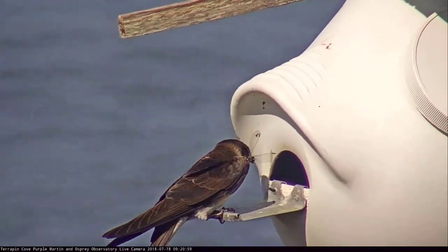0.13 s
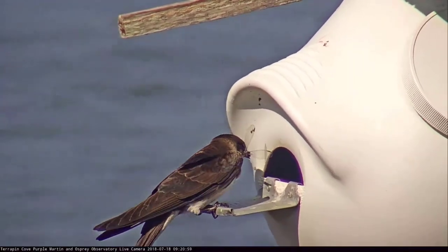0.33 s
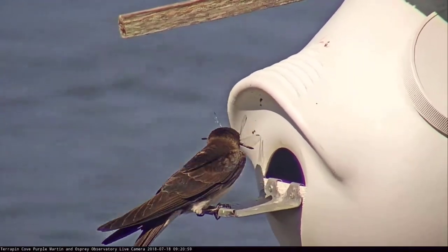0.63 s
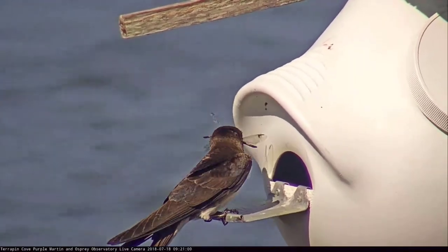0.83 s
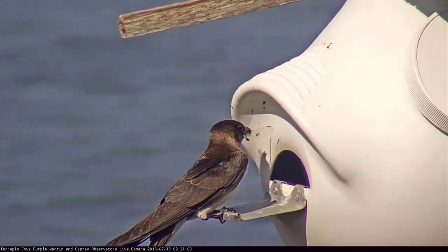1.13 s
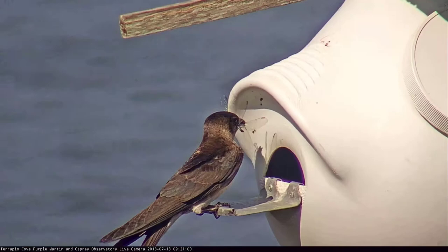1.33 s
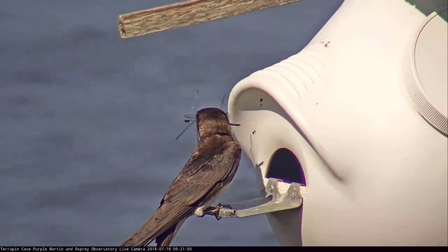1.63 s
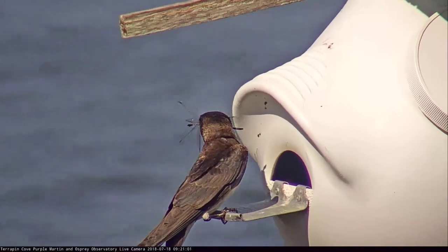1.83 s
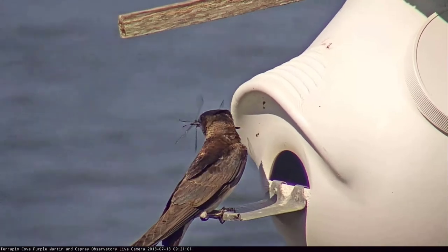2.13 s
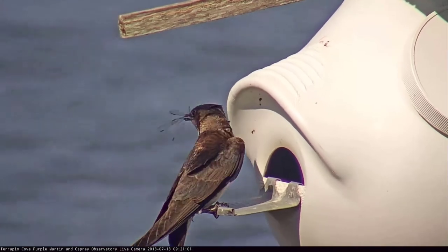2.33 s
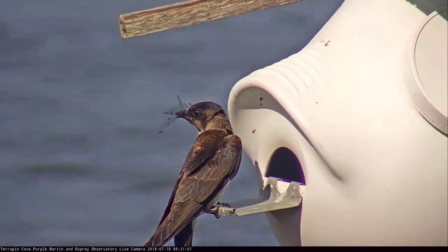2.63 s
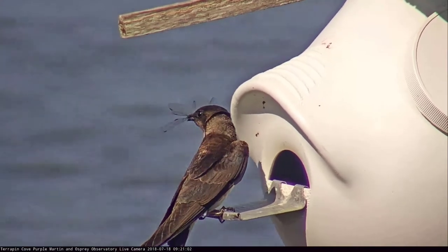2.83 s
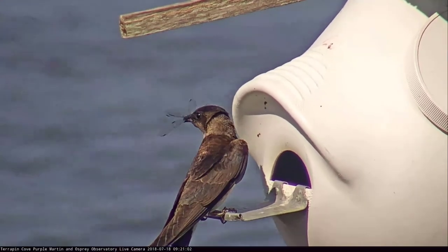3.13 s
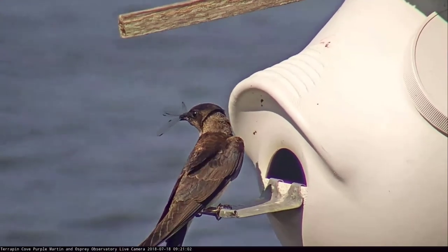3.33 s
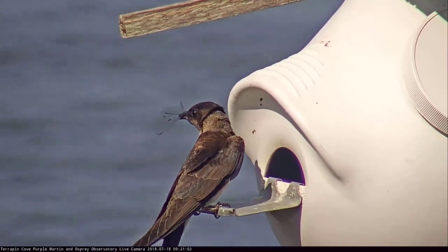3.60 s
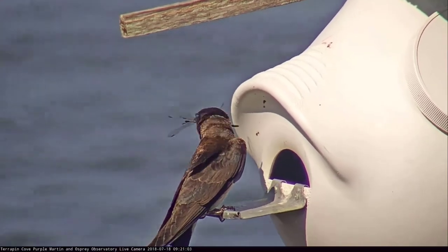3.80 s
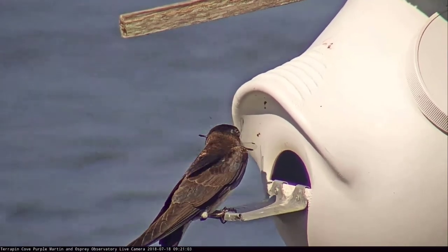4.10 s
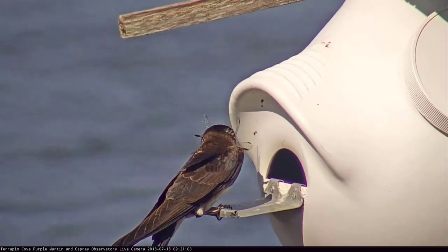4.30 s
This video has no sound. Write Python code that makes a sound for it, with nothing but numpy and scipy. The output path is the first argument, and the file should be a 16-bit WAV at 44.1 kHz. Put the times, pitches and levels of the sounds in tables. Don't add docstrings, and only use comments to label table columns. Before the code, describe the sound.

Outdoors beside water, many martins call several times a second with short whistled chirps that slide down. A loud longer reedy call comes early, nestlings buzz throughout, a close bird chortles and sings a falling run around one to two seconds, and more calls follow. A distant chorus and light breeze lie beneath; the camera microphone slightly clips the loudest notes.

```python
import sys
import numpy as np
from scipy import signal
from scipy.fft import rfft, irfft, next_fast_len
from scipy.io import wavfile
from scipy.ndimage import uniform_filter1d, map_coordinates

SR = 44100
rng = np.random.default_rng(int(sys.argv[2]) if len(sys.argv) > 2 else 0)


def to_wav(s):
    ch = np.atleast_2d(s).T
    pcm = np.round(np.clip(ch, -1, 1) * 32767)
    wavfile.write(sys.argv[1], SR, pcm.astype(np.int16))


def how_loud(loudness_db):
    steps = np.asarray(loudness_db, float) / 20
    return 10 ** steps


N = 196597

# (frequency [Hz], level [dB])
THROAT_TONE = [(1500, -13.5), (2300, -8.5), (3300, -0.5), (4500, 1), (7000, -11.5)]
LOUDEST_HZ = 3600


def unit(x):
    return x / np.sqrt(np.mean(x ** 2) + 1e-20)


def along(points, hz):
    f, v = np.transpose(points)
    return np.interp(np.log(hz + 1), np.log(f + 1), v)


def curve(rows):
    return np.interp(np.arange(N) / SR, *np.transpose(rows))


def wobble(rate, size=N):
    knots = rng.standard_normal(int(size * rate / SR) + 4)
    return map_coordinates(knots, [np.arange(size) * rate / SR])


def filtered(x, response):
    m = next_fast_len(N + 8192)
    return irfft(rfft(x, m) * response(np.fft.rfftfreq(m, 1 / SR)), m)[:N]


def throat(x):
    return filtered(x, lambda hz: how_loud(along(THROAT_TONE, hz)))


def rush(spectrum, patchy_db):
    z = signal.stft(rng.standard_normal(N + 512), nperseg=512)[2]
    field = uniform_filter1d(rng.standard_normal(z.shape), 5, 0)
    field = uniform_filter1d(field, 4, 1)
    x = signal.istft(z * how_loud(patchy_db * unit(field)), nperseg=512)[1][:N]
    return unit(filtered(x, lambda hz: how_loud(along(spectrum, hz))))


def add(track, s, sound):
    track[SR + round(s * SR):][:len(sound)] += sound


def whistle(hz, overtone_db):
    phase = 2 * np.pi * np.cumsum(hz) / SR
    return np.sin(phase) + how_loud(overtone_db) * np.sin(2 * phase)


def echoed(sound, echo_db, chance):
    out = np.pad(sound, (0, SR // 30))
    add(out, .003 + .003 * chance[0] - 1, how_loud(echo_db - 2 * chance[1]) * sound)
    for late, size in chance[2:].reshape(-1, 2):
        add(out, .006 + .018 * late - 1, how_loud(echo_db - 9 - 8 * late - 5 * size) * sound)
    return out


def slide(u, bend=.8):
    held = 1.12 * u ** 2 / (u + .12)
    return (np.exp(-bend * held) - np.exp(-bend)) / (1 - np.exp(-bend))


def chirps(rows, glide, flutter_db, overtone_db, echo_db, fade, tail=0, rise=1.7):
    track = np.zeros(N + 2 * SR)
    flutter, quiver = wobble(190, N + SR), wobble(260, N + SR)
    for (s, length, start_hz, end_hz, db, top), chance in zip(rows, rng.random((len(rows), 8))):
        u = np.linspace(0, 1 + tail, max(round(length * (1 + tail) * SR), 9))
        first = round(abs(s) * SR)
        at = slice(first, first + len(u))
        top = np.clip(top, .2, .92)
        falling = np.abs(np.sin(np.pi / 2 * (1 + tail - u) / (1 + tail - top))) ** fade
        swell = np.where(u < top, np.sin(np.pi / 2 * u / top) ** rise, falling)
        hz = end_hz + (start_hz - end_hz) * glide(u) + 35 * quiver[at]
        note = how_loud(db + flutter_db * flutter[at]) * swell * whistle(hz, overtone_db)
        add(track, s, echoed(note, echo_db, chance))
    return track[SR:SR + N]


def falls():
    # (time [s], length [s], start [Hz], end [Hz], peak [dB])
    close_calls = [(-.011, 0.032, 3780, 2556, -2), (.016, 0.019, 4750, 3600, -9),
                   (.04, 0.019, 2970, 2073, -1), (.08, 0.031, 4400, 3025, -6.5),
                   (.555, 0.023, 4300, 3420, -18), (.428, 0.015, 4020, 3366, -5),
                   (.73, 0.028, 2990, 2240, -11), (.757, 0.046, 3100, 1613, -9),
                   (1.784, 0.013, 4495, 3980, -15.5), (2.01, 0.012, 4670, 3870, -7.5),
                   (2.358, 0.036, 3410, 2145, -9), (2.387, .02, 3400, 2703, -10),
                   (2.377, 0.0172, 4904, 4254, -14.5), (2.572, 0.028, 4750, 3750, -9),
                   (2.595, 0.032, 3950, 3030, -5.5), (2.588, 0.012, 3780, 3170, -5.5),
                   (3.385, 0.012, 4457, 3866, -13.5), (3.427, 0.026, 3130, 2410, -12.5),
                   (3.707, .012, 3270, 2750, -23), (4.19, 0.024, 4010, 3030, -17.5),
                   (4.444, 0.032, 4630, 3530, -2)]
    # (time [s], start [Hz], end [Hz], peak [dB])
    steep = [
        (.602, 3757, 2240, -17),
        (.696, 4040, 3100, -20.5),
        (.878, 4950, 3830, -40),
        (.945, 2800, 2330, -26),
        (1.543, 2380, 1750, -19),
        (1.822, 2320, 1810, -19),
        (3.092, 3600, 2300, -20.5),
        (3.285, 2970, 2400, -30),
        (3.235, 2910, 2320, -15.5),
    ]
    # (time [s], start [Hz], end [Hz], peak [dB])
    common = [(.028, 2140, 1960, -12), (.066, 3976, 3460, -16), (.713, 3040, 2460, -16.5),
              (1.835, 2770, 2200, -16), (1.878, 4830, 3430, -23), (1.879, 3590, 2930, -25.5),
              (1.984, 2450, 2000, -22.5), (2.146, 4000, 3470, -16), (2.158, 2860, 2220, -15.5),
              (2.334, 3600, 2460, -21.5), (2.846, 3300, 2680, -24), (3.207, 3300, 2700, -24.5),
              (3.255, 3420, 2720, -38), (3.865, 3000, 2400, -17.5), (3.92, 3250, 2320, -26),
              (3.985, 3180, 2420, -28), (4.402, 4610, 2787, -16.5), (4.441, 3070, 2710, -18)]
    # (time [s], start [Hz], end [Hz], peak [dB])
    gentle = [(.066, 1920, 1650, -15), (.074, 2450, 2100, -17), (.291, 3940, 3470, -21),
              (.434, 2700, 2050, -15.5), (.497, 4120, 3680, -19.5), (.805, 2397, 2100, -11),
              (.984, 2680, 2470, -21), (1.936, 3020, 2780, -22), (2.062, 4310, 3870, -18),
              (2.07, 2580, 2320, -22), (2.438, 2510, 2190, -25), (2.874, 2580, 1830, -19),
              (3.474, 3180, 2560, -27.5)]
    rows = [*close_calls]
    for table, octaves_per_s in [(steep, 34.8), (common, 14), (gentle, 9.7)]:
        rows += [(s, np.log2(a / b) / octaves_per_s, a, b, db) for s, a, b, db in table]
    timed = []
    for s, length, a, b, db in rows:
        top = np.clip(0.93 * np.log(a / LOUDEST_HZ) / np.log(a / b), 0.26, 0.82)
        timed.append((s, length, a, b, db, top))
    return timed


def reedy(table, glide):
    # (frequency [Hz], level [dB])
    octave_tilt = [(4500, 0), (6500, -7)]
    reeds = chirps([(*row, 0.17) for row in table], glide, flutter_db=1.8, overtone_db=-19,
                   echo_db=-6, fade=4, tail=.25, rise=1.3)
    trail = chirps([(*row[:4], row[4] - 15, .7) for row in table], glide, flutter_db=2.5,
                   overtone_db=-24, echo_db=-14, fade=0.2)
    rows = [(s, length, 2 * a, 2 * b, -17 + 0.32 * db, .65) for s, length, a, b, db in table]
    octaves = chirps(rows, glide, flutter_db=0.5, overtone_db=-28, echo_db=-3.5, fade=0.33, tail=0.11)
    return reeds + trail + filtered(octaves, lambda hz: how_loud(along(octave_tilt, hz)))


def adults():
    # (time [s], length [s], start [Hz], end [Hz], peak [dB])
    arched = [(0.452, 0.028, 3120, 2990, -19.5), (.489, 0.027, 2875, 2550, -32),
              (0.735, 0.017, 4900, 4700, -20), (0.796, 0.031, 4160, 4020, -24.5),
              (.822, 0.014, 2060, 1990, -17.5), (1.438, 0.0081, 4500, 4400, -12.5),
              (1.768, 0.018, 3650, 3140, -20), (1.905, 0.03, 3870, 3390, -23),
              (2.421, .013, 3305, 3250, -20), (2.426, 0.02, 3547, 3310, -14),
              (2.567, 0.016, 4850, 4470, -18), (2.804, 0.014, 3920, 4150, -30),
              (2.877, 0.019, 3217, 3130, -16), (2.888, 0.048, 4020, 3800, -24.5),
              (3.251, 0.013, 3260, 2670, -22), (3.364, 0.019, 4760, 4700, -22.5),
              (3.626, 0.016, 4600, 4410, -18.5), (3.634, .024, 4300, 3330, -15),
              (4.058, 0.013, 3250, 3170, -19), (4.136, 0.015, 4110, 3900, -16),
              (4.14, 0.019, 2960, 3040, -19)]
    # (time [s], length [s], start [Hz], end [Hz], peak [dB])
    long_falls = [
        (2.817, .07, 4140, 1645, -9.5),
        (3.023, .071, 3620, 1713, -8),
    ]
    # (time [s], length [s], start [Hz], end [Hz], peak [dB])
    held_calls = [
        (.371, .077, 4194, 1808, 0.16),
        (3.997, .06, 3754, 1672, -7),
    ]
    hold = .05
    slides = chirps(falls(), slide, flutter_db=1.1, overtone_db=-19, echo_db=-5.5, fade=2.47, tail=0.56)
    reeds = reedy(long_falls, lambda u: slide(u, 2.4))
    reeds = reeds + reedy(held_calls, lambda u: slide(np.maximum(u - hold, 0) / (1 - hold), 1.65))
    warbles = chirps([(*row, .36) for row in arched], lambda u: 1 - u ** 2, flutter_db=3.2,
                     overtone_db=-33, echo_db=-11, fade=0.22)
    return throat(slides + reeds) + warbles


def chorus(count):
    # (time [s], level [dB])
    far_level = [
        (0.0, -28.5),
        (3.85, -28),
        (4.02, -26.5),
        (4.46, -29),
    ]
    # (frequency [Hz], level [dB per Hz])
    blur = [(710, -27), (1200, -22.5), (1520, -17), (2200, -8), (2630, -4), (3620, 2.5), (4660, -8),
            (5710, -8.5), (6590, -18), (9000, -53), (11700, -39), (19800, -120)]
    s, length, pitch, drop, size, top = rng.random((count, 6)).T
    start_hz = 3000 + 2300 * pitch
    end_hz = start_hz * (.82 - 0.241 * drop)
    rows = np.transpose([s * N / SR, 0.01493 + 0.02936 * length, start_hz, end_hz, 7 * size, 0.11 + 0.21 * top])
    calls = chirps(rows, slide, flutter_db=4.0, overtone_db=-28, echo_db=-9.5, fade=0.99)
    calls = filtered(calls, lambda hz: how_loud(0.088 * along(blur, hz)))
    return how_loud(curve(far_level)) * (how_loud(-10.5) * unit(calls) + how_loud(-1.5) * rush(blur, patchy_db=2.5))


def insect():
    # (time [s], level [dB])
    insect_level = [
        (0.0, -51),
        (0.17, -62),
        (4.46, -61),
    ]
    clicks = np.sin(2 * np.pi * np.cumsum(140 + 5 * wobble(10.0)) / SR)
    gate = np.maximum(clicks, 0) ** 2
    ring = np.sin(2 * np.pi * np.cumsum(9600 + 70 * wobble(72)) / SR)
    return how_loud(curve(insect_level) + 6.5) * unit(gate * ring)


def breeze():
    # (time [s], peak [dB])
    gusts = [
        (1.465, -43),
        (1.801, -34),
        (1.83, -26.5),
        (1.857, -31),
        (1.941, -37),
    ]
    # (time [s], peak [dB])
    ticks = [
        (1.425, -6.5),
    ]
    # (time [s], level [dB])
    wind_level = [
        (0.0, -42),
        (0.66, -44.5),
        (4.46, -42.5),
    ]
    # (frequency [Hz], level [dB per Hz])
    air = [(20, -29), (45, 4), (65, 2), (130, 1.5), (300, -5), (1000, -14.5), (3000, -16), (16000, -24.5)]
    track, t = np.zeros(N + 2 * SR), np.arange(SR // 10) / SR
    for s, db in gusts:
        bump = np.sin(2 * np.pi * 80 * t) * np.exp(-((t - .038) / 0.0049) ** 2)
        add(track, s - .03, how_loud(db + 7.0) * bump)
    for s, db in ticks:
        add(track, s, how_loud(db - 60 * t / .002) * uniform_filter1d(rng.standard_normal(len(t)), size=3))
    hum = how_loud(-48.5 + 1.7 * wobble(6.26)) * np.sin(2 * np.pi * np.cumsum(96 + 2.76 * wobble(8.9)) / SR)
    noise = how_loud(curve(wind_level) + 1.5 * wobble(3.9)) * rush(air, patchy_db=1.2)
    return track[SR:SR + N] + hum + noise


def nestlings():
    # (time [s], length [s], start [Hz], end [Hz], peak [dB])
    buzzes = [(0.052, 0.083, 3883, 3316, -15), (0.432, 0.13, 3783, 3358, -15),
              (0.448, .095, 3130, 2800, -20.5), (0.527, 0.11, 3244, 2750, -20.5),
              (1.038, 0.086, 3620, 3810, -29), (1.263, 0.13, 3660, 2450, -23.5),
              (1.286, 0.11, 4073, 3660, -20), (1.385, 0.054, 3700, 3345, -19.5),
              (1.43, 0.041, 3126, 2860, -13.5), (1.481, 0.033, 2580, 2277, -21),
              (1.786, 0.1, 4030, 3562, -19.5), (2.08, 0.095, 3563, 2872, -14.5),
              (2.18, .065, 3780, 3296, -18.5), (2.225, 0.12, 3080, 2544, -26),
              (2.694, 0.062, 3800, 3620, -21), (2.861, 0.071, 3728, 3372, -13),
              (2.903, 0.11, 3275, 2657, -14.5), (3.182, 0.1, 3740, 3476, -16),
              (3.415, 0.056, 3600, 3510, -19), (3.459, 0.057, 3200, 2793, -19.5),
              (3.546, 0.082, 3714, 3600, -18), (3.57, .14, 3250, 2610, -23),
              (3.899, 0.12, 3883, 3553, -13.5), (4.065, 0.076, 3600, 3480, -14.5),
              (4.111, 0.098, 2997, 2860, -20), (4.159, 0.081, 3600, 3100, -12),
              (4.19, 0.1, 2850, 2717, -20), (4.407, 0.067, 3425, 3437, -17)]
    # (peak [dB], depth [Hz])
    shake_depth = [(-21, 117), (-19, 187)]
    track = np.zeros(N + 2 * SR)
    shake = 2 * np.pi * np.cumsum(140 + 14 * wobble(30, N + SR)) / SR
    flutter, quiver = wobble(410, N + SR), wobble(310, N + SR)
    for (s, length, start_hz, end_hz, db), chance in zip(buzzes, rng.random((len(buzzes), 8))):
        u = np.linspace(0, 1, round(length * SR))
        at = slice(round(s * SR), round(s * SR) + len(u))
        depth = 1.05 * np.interp(db, *np.transpose(shake_depth))
        hz = start_hz + (end_hz - start_hz) * u + depth * (np.sin(shake[at]) + .2 * quiver[at])
        swell = np.abs(np.sin(np.pi * u ** .8)) ** .75 * (1 - .32 * np.cos(shake[at]))
        buzz = how_loud(db + 0.19 * flutter[at]) * swell * whistle(hz, overtone_db=-53)
        add(track, s, echoed(buzz, echo_db=-13.0, chance=chance))
    return track[SR:SR + N]


def strokes():
    # (time [s], length [s], start [Hz], end [Hz], peak
    # [dB])
    thin_falls = [(0.162, 0.026, 3400, 2400, -21.5), (0.166, .044, 6100, 2345, -19.5),
                  (0.2, 0.033, 5500, 3930, -33), (.221, .013, 3170, 2650, -18.5),
                  (.229, 0.014, 5550, 4430, -27), (0.232, 0.031, 4250, 2335, -17),
                  (.261, 0.033, 5000, 4180, -26), (0.792, 0.022, 3950, 2960, -18),
                  (0.812, 0.026, 4830, 4050, -22.5), (0.82, 0.024, 4100, 2900, -18.5),
                  (0.83, 0.023, 7050, 5000, -21.5), (0.941, 0.045, 5050, 2470, -30),
                  (1.095, 0.034, 4214, 3195, -20.5), (1.195, 0.033, 3990, 2454, -18),
                  (1.68, 0.035, 4300, 2470, -21.5), (1.957, 0.025, 4500, 3410, -26.5),
                  (2.358, 0.043, 6750, 3945, -14.5), (2.385, .046, 3287, 2120, -9.5),
                  (2.407, 0.031, 5050, 4200, -23), (2.439, 0.035, 4120, 2380, -18),
                  (2.476, .021, 4000, 3140, -43), (2.637, 0.053, 3700, 2390, -27.5),
                  (2.677, 0.026, 4030, 2550, -28), (3.05, .048, 4750, 3350, -18.5),
                  (4.051, .036, 2660, 1780, -17.5), (3.341, 0.029, 4000, 2500, -21),
                  (3.782, 0.046, 4550, 2790, -18.5)]
    # (time [s], length [s], start [Hz], end [Hz], peak [dB])
    straight_falls = [
        (0.742, 0.032, 4580, 2897, -5.5),
        (1.447, 0.024, 4450, 2990, -8),
        (1.473, 0.0257, 3300, 2360, -7.5),
        (1.8, 0.022, 3750, 2645, -10.5),
        (1.996, 0.043, 4850, 2445, -11.5),
        (2.093, .048, 4200, 2446, -9.5),
        (3.373, .043, 4750, 2530, -10.5),
        (3.823, 0.037, 4450, 2860, -7.5),
        (4.144, .017, 4250, 3416, -6.5),
    ]
    # (time [s], length [s], start [Hz], end [Hz], peak [dB])
    hard_notes = [
        (1.423, 0.0061, 3600, 3320, -4),
        (1.432, 0.0068, 3250, 3080, -6.5),
        (1.52, .01, 3590, 2660, -7.5),
        (1.568, 0.013, 2820, 2590, -10),
    ]
    rows = [(s, length, a, b, db, 0.033 + (a - LOUDEST_HZ) / (a - b))
            for s, length, a, b, db in straight_falls]
    straight = chirps(rows, lambda u: slide(u, 0.361), flutter_db=1.0, overtone_db=-18.5,
                      echo_db=-7.5, fade=0.88, tail=0.13, rise=1.12)
    thin = chirps([(*row, .55) for row in thin_falls], lambda u: slide(u, 0.93), flutter_db=1.2,
                  overtone_db=-20, echo_db=-11, fade=.6, rise=.55)
    snaps = chirps([(*row, .2) for row in hard_notes], lambda u: 1 - u, flutter_db=.8,
                   overtone_db=-24, echo_db=-13, fade=.45, rise=1.1)
    return throat(straight + thin) + snaps


def arch(flat):
    return lambda u: 1 - np.abs((u - .42) / .58) ** flat


def singer():
    # (time [s], length [s], top [Hz], peak [dB], flatness of the top [power])
    song = [
        (1.597, 0.035, 2485, -15, 6.3),
        (1.641, 0.043, 2366, -17.5, 2),
        (1.689, 0.035, 1983, -21.5, 2.9),
        (1.735, 0.039, 1750, -33, 3),
    ]
    # (time [s], start [Hz], peak [dB])
    chortle = [
        (1.021, 2696, -11.5),
        (1.091, 2580, -16.5),
        (1.152, 2514, -15),
    ]
    chortle_s, end_hz = .039, 1150
    drop = lambda u: np.cos(np.pi / 2 * u ** 1.4) ** 2
    notes = np.zeros(N)
    for s, length, hz, db, flat in song:
        notes += chirps([(s, length, hz, .74 * hz, db, .25)], arch(flat), flutter_db=2.4,
                        overtone_db=-16, echo_db=-12, fade=.7, rise=.8)
    heads = [(s, chortle_s, hz, end_hz, db, .2) for s, hz, db in chortle]
    trails = [(s, chortle_s, hz, end_hz, db / 3 - 32, .6) for s, hz, db in chortle]
    bright = chirps(heads, drop, flutter_db=1.5, overtone_db=-25, echo_db=-11, fade=10, rise=.9)
    faint = chirps(trails, drop, flutter_db=2, overtone_db=-25, echo_db=-10, fade=0.6)
    return notes + bright + faint


def shore(x):
    # (frequency [Hz], time [s])
    decay = [(1500, 0.18), (4000, 0.17), (8000, 0.31)]
    out, step = np.zeros(N + 3 * SR), SR // 4
    for start in range(0, N, step):
        hz, t, z = signal.stft(rng.standard_normal(SR // 2), SR, nperseg=256)
        tail = signal.istft(z * how_loud(-60 * t / along(decay, hz)[:, None]), SR, nperseg=256)[1]
        add(out, start / SR, signal.fftconvolve(x[start:start + step], tail / np.linalg.norm(tail)))
    return how_loud(-7.0) * filtered(out[SR:SR + N], lambda hz: (hz > 1300) * (hz < 7000))


def scene():
    near = adults() + strokes() + nestlings()
    close = singer()
    echo = shore(near + how_loud(-6) * close)
    return (near + close + echo + chorus(count=320) + insect() + breeze())[None]


def low_pass(x):
    return signal.sosfilt(signal.butter(12, 15820, fs=SR, output="sos"), x)


def record(dry):
    inner_rate = 48000
    x = dry[0] / (1 + np.abs(dry[0] / .99) ** 24) ** (1 / 24)
    exact = np.arange(N) * inner_rate / SR
    slip = (np.round(exact) - exact) * SR / inner_rate
    x = map_coordinates(x, [np.arange(N) + slip], order=5, mode="nearest")
    mix = filtered(x, lambda hz: hz < 15800)[None]
    return low_pass(mix)


dry = scene()
out = record(dry)
to_wav(out)
```